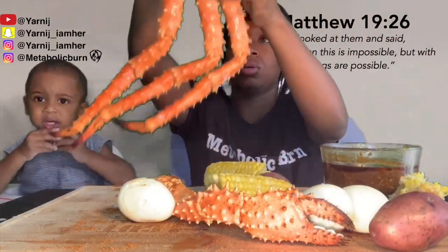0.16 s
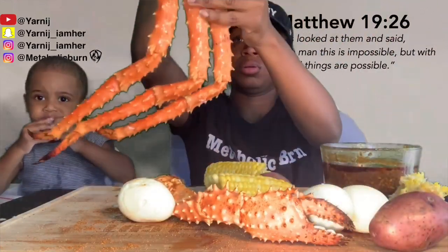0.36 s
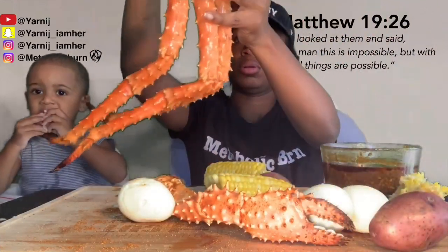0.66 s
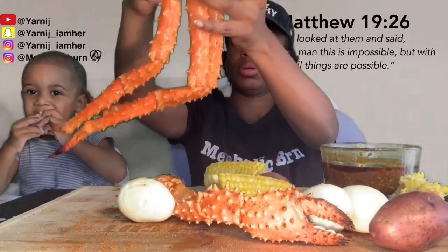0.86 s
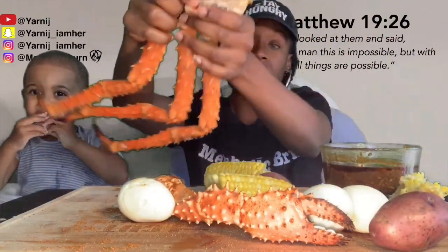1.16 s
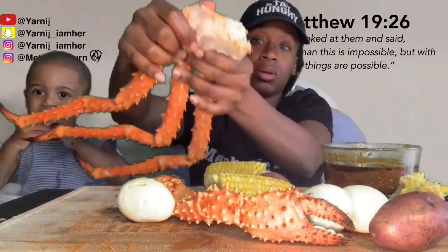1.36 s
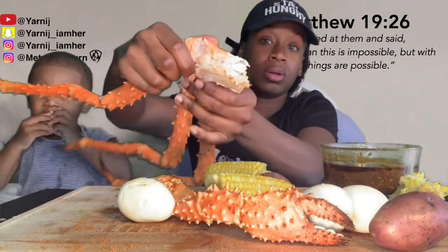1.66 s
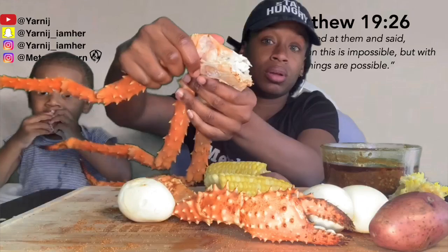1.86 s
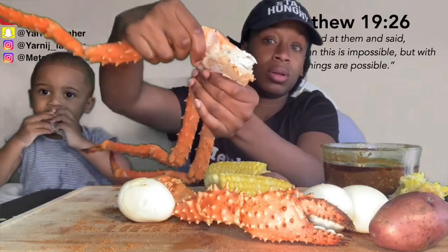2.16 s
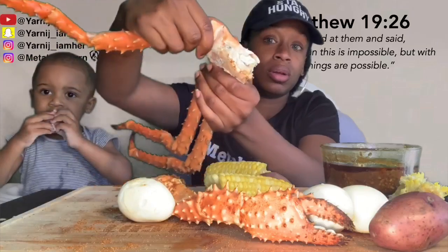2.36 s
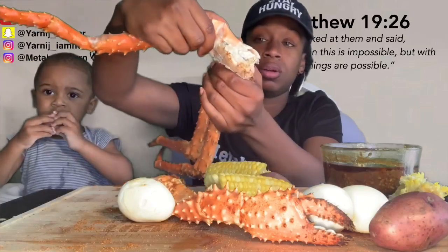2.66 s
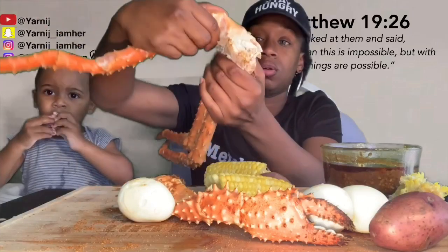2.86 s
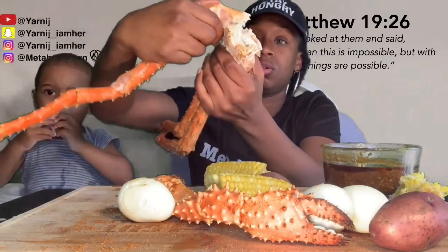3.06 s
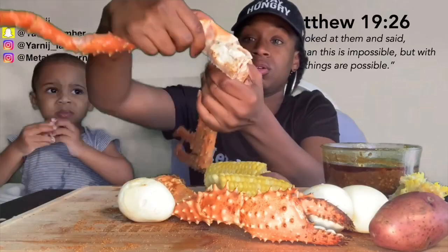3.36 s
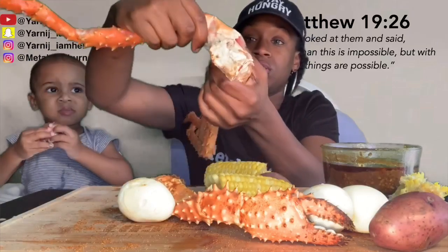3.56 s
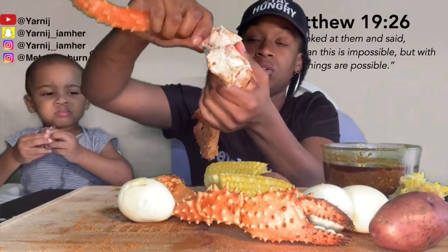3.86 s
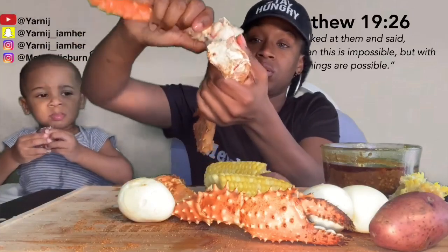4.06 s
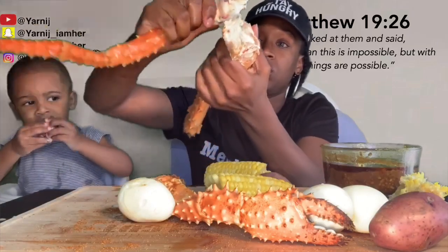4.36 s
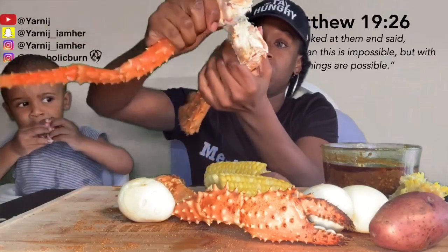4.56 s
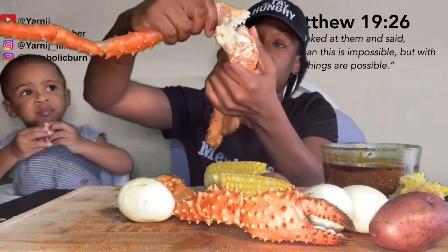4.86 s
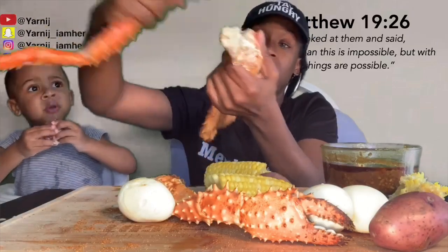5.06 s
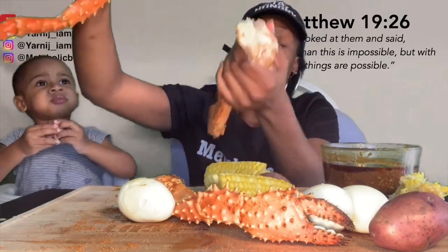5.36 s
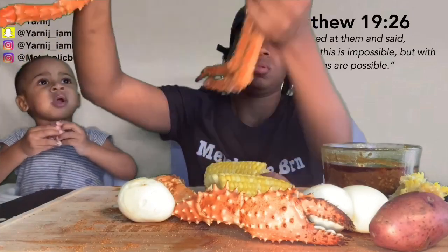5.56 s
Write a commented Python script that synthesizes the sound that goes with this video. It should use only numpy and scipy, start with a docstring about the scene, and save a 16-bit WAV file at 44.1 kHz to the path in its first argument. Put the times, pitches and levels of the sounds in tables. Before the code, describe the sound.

A close stereo phone pickup at a table in a small, hard room, with very low rumble and faint appliance tones throughout. From 0 to 1.4 s, cooked crab legs quietly rub, rustle and knock, the firmest hollow clacks around 0.9-1.1 s with a dull brush of sleeves. A nearly pure low hum holds from about 1.15 to 2.2 s; a soft double bump thuds at 1.6 s. Bright cracks start at 2.35 s, thickening with grainy tearing into the loudest crunching volley at 2.7-2.9 s, then a strong snap at 2.99 s. A tiny creak and ticks come at 3.3-3.4 s, a sharp crack at 3.55 s, lesser ones at 3.7 and 3.9 s, another strong snap at 4.05 s. Small ticks and faint rubbing follow until a hard crack at 5.0 s. Splinters and hollow shell ring briefly; the end is nearly quiet, with a faint knock and rustle near 5.4 s.

```python
"""Crab legs are snapped by hand at a table near a phone: each break is a snap and splinters ringing hollow shell.
Bending tears fibres (grainy noise) and sheds chips (tiny breaks); one twisted joint creaks (stick-slip pulses).
Before and between, legs rub, rustle (coloured grains) and knock (softer breaks); sleeves brush.
A dull modal bump and one low hum (sine and octave) precede the breaks; rumble and faint tones run throughout.
Table scatter and a small hard room (shaped noise responses) answer the hands."""
import sys
import numpy as np
from scipy import signal
from scipy.fft import rfft, irfft, next_fast_len
from scipy.io import wavfile
from scipy.ndimage import uniform_filter1d

SR = 44100
rng = np.random.default_rng(int(sys.argv[2]) if len(sys.argv) > 2 else 0)


def unload_wav(signal):
    """Save mono or channel-first audio to the path in sys.argv[1] as 16-bit WAV at rate SR, clipped to [-1, 1]."""
    wavfile.write(
        sys.argv[1],
        SR,
        np.round(np.clip(np.atleast_2d(signal).T, -1, 1) * 32767).astype(np.int16),
    )


N = 251655
TIME_S = np.arange(N) / SR

# Room rumble level: time_s, level_db
RUMBLE = [(0, -61), (1.3, -58), (2.9, -58), (4.4, -62), (5.7, -63.5)]
# Rumble spectrum: freq_hz, gain_db
RUMBLE_COLOUR = [(15, -32), (30, -3), (59, 2), (100, -8), (130, -3), (185, -11.5), (270, -11), (344, -23),
                 (450, -26.5), (1070, -28.5), (2100, -39.5), (4000, -43.5), (8000, -45), (16000, -48.5)]
# Faint appliance tones, pitch wandering: centre_hz, level_db
TONES = [(63.5, -71), (82.5, -70), (120, -71), (269, -79.5)]

# Legs sliding over each other: start_s, end_s, rub_db, rustle_db, plate_hz
HANDLING = [(.01, 0.19, -72.5, -73.5, 4740), (0.364, 0.63, -73.5, -86, 3700),
            (0.891, 1.05, -68, -70.5, 3200), (1.326, 1.43, -72, -73.5, 6550),
            (1.615, 1.673, -80, -77.5, 3350), (1.804, 2.3, -80, -97, 4810), (4.56, 4.83, -79.5, -85, 1920),
            (5.445, 5.48, -88.5, -83, 5390)]
# Dull rub spectrum: freq_hz, gain_db
RUB_COLOUR = [(200, 2.5), (400, -2.5), (700, -4.5), (1100, 0), (1480, 7), (1850, 2.5), (2120, -16),
              (4000, -25)]
# Spiny rustle spectrum: freq_hz, gain_db
RUSTLE_COLOUR = [(1200, -12.5), (2500, -4), (3600, 1), (5200, -3), (8000, -11.5), (16000, -16)]
RUB_ATTACK_S, RUB_RELEASE_S, RUSTLE_LIFT_DB = 0.03, 0.065, 9

# Joints bent until fibres tear: start_s, end_s, level_db
BENDS = [(2.442, 2.689, -64), (2.6, 2.91, -64), (3.33, 3.37, -67), (3.594, 3.676, -55.5),
         (3.937, 4.051, -67.5), (4.105, 4.198, -75.5), (4.367, 4.565, -82), (4.92, 5.002, -74)]
# Tearing spectrum: freq_hz, gain_db
TEAR_COLOUR = [(1000, -29), (3000, -6.5), (6500, -0.5), (9000, -2), (12000, -2.5), (16000, -7.5)]
BEND_ATTACK_S, BEND_RELEASE_S = 0.019, 0.023

# Unbroken legs meeting: start_s, level_db, brightness_db_per_octave, hollow_db, body_hz, body_lift_db
KNOCKS = [(0.02, -57, 8.5, -6, 3800, 16), (0.09, -71.5, -11, -1.5, 1350, 14),
          (0.1754, -65.5, -3.5, 13.5, 1380, 17), (0.385, -69, 2, 23.5, 3540, 11.5),
          (0.542, -71.5, -5.5, 9, 1240, 1), (0.574, -73.5, -4, 5, 3600, 14),
          (0.6589, -70.5, 3.5, 23, 1310, 6), (0.9105, -46, -0.5, 9, 3270, 11),
          (0.9767, -60.5, -7, 0.5, 3450, 4), (0.993, -56, -1, 7, 2650, 4),
          (1.0563, -53.5, 1.5, 15, 2310, 13.5), (1.0583, -55, -1, 18, 1160, 3.5),
          (1.074, -65, 4, 15, 1310, 5), (1.2223, -74, -11, 4.5, 2680, 17), (1.365, -68, -1.5, 13, 880, 11),
          (1.842, -72.5, -1, 10.5, 1240, 9), (4.66, -81, -4, 19.5, 1370, 10.5),
          (4.816, -67.5, 6, -3.5, 3800, 5.5), (4.853, -67.5, -4, 3.5, 1243, 6),
          (5.402, -71.5, -1, 16.5, 1843, 16)]
# Soft contact spectrum: freq_hz, gain_db
KNOCK_COLOUR = [(350, -3), (500, -6.5), (680, 5.5), (900, -2.5), (1200, 5), (1650, -6), (2300, -2.5),
                (3300, -4), (5000, -2.5), (8500, -17), (11500, -4.5), (16000, -10)]
KNOCK_SPLINTER_DB = -5.5  # chatter of the spines, relative to the snap
KNOCK_ARCH_DB = 3.5  # softer contact, narrower arch than a break
KNOCK_ROOM_DB, KNOCK_LEAD_S = -1.5, 0.00007  # gathered further left: left port leads

# Cloth spectrum: freq_hz, gain_db
SLEEVE_COLOUR = [(100, -19.5), (230, 3.5), (380, -3.5), (620, -19), (900, -12.5), (3000, -45)]
SLEEVE_START_S, SLEEVE_END_S, SLEEVE_DB = 0.88, 1.1, -66

HUM_HZ, HUM_DB = 123.5, -54.5  # centre of the wavering pitch and level
HUM_START_S, HUM_END_S, HUM_ATTACK_S, HUM_RELEASE_S = 1.146, 2.23, 0.019, 0.04

# Contacts as the legs are turned over: start_s, relative_level_db
BUMP_CONTACTS = [(1.603, -7.5), (1.616, 1)]
# Bump modes before detuning and sag: freq_hz, t60_s, level_db
BUMP_MODES = [(205.7, 0.44, -49), (252, 0.18, -49.5), (326.6, 0.37, -57), (434, 0.14, -65),
              (562, 0.21, -60)]
BUMP_SAG_SHARE, BUMP_SAG_S = 0.12, 0.063  # ring flattens as the grip loosens

# Shell breaks: start_s, level_db, brightness_db_per_octave, hollow_db, splinter_re_snap_db, body_hz, body_lift_db
BREAKS = [(2.3467, -46, 6.5, -10.5, -9, 5600, 9.5), (2.4364, -52, 9, 0, -3.5, 5240, 9.5),
          (2.4489, -56, 7, -3.5, -3.5, 3650, 5.5), (2.4702, -56, 7, -2.5, -2, 2990, 7),
          (2.4801, -59.5, 6, -6, -8, 5000, 2), (2.4862, -61.5, 12, -3, -8, 2990, 3),
          (2.508, -39.5, 7.5, 3, -2.5, 5940, 10), (2.521, -48.5, 8, 1, -4, 3630, 7.5),
          (2.5815, -54, 10.5, 4, -16, 4020, 1.5), (2.5854, -47, 10.5, 2.5, -13, 4000, 6.5),
          (2.592, -38, 2.5, 3, 0.5, 1270, 6.5), (2.6255, -53, 6.5, -0.5, -10, 8550, 6.5),
          (2.6351, -52, 8, 9, 2, 1370, 1.5), (2.6664, -47.5, 9, -3, -6, 3826, 1),
          (2.702, -51, 6, 0.5, -2, 4200, 7), (2.7148, -27, 5, -1.5, 1, 4700, 8),
          (2.7228, -37.5, -0.5, -5, 8, 2540, 10.5), (2.736, -34.5, 8, 5.5, -15, 2990, 5.5),
          (2.7534, -52.5, 3.5, -10.5, -11, 5000, 3.5), (2.7597, -34.5, 10.5, 14, -16, 4450, -2.5),
          (2.7726, -30, 9.5, 10.5, -4, 10800, 0.5), (2.781, -39, 4.5, 7.5, -10, 6000, 0.5),
          (2.7927, -42, -4, -2, 2, 880, 8), (2.8037, -38.5, 1, -1.5, -12, 8400, 5.5),
          (2.8177, -42, 5, -13.5, -6, 6000, 6), (2.8465, -31.5, 2.5, 2, 1, 890, 8.5),
          (2.8577, -37, 1.5, -1, -7.5, 2680, 1.5), (2.8649, -37, 4.5, -1, -14, 840, 5.5),
          (2.8706, -30, 5, 3, -8, 700, 7.5), (2.878, -36, 2.5, 2, -2, 2400, 4),
          (2.886, -35.5, 4, 3.5, -7, 5200, 12), (2.9856, -30.5, 3.5, 5.5, -4, 2740, 5),
          (2.9945, -45.5, 5, -2, -3, 2200, 6), (3.009, -49, 3.5, 8, -3.5, 1074, 9),
          (3.3112, -49, 7.5, -1, 5.5, 3050, 15.5), (3.3212, -59.5, 9, -6, -8, 3300, 11),
          (3.3295, -58.5, 13.5, -11.5, 4, 3480, 15), (3.402, -65.5, -7, -4.5, -7, 1200, 11),
          (3.4216, -48, -1.5, -0.5, -7.5, 1240, 6), (3.434, -64, -4, -0.5, -8, 1220, 10),
          (3.5513, -31, 7, 7, -7.5, 3240, 5.5), (3.558, -37, 7.5, 1.5, -8.5, 2000, 9),
          (3.5613, -36, 4, -4.5, -5, 2110, 2.5), (3.7193, -46, 5, 9.5, -9.5, 2860, 3.5),
          (3.8764, -50.5, 1, 3, -9, 1190, 6), (3.89, -58, 4, -4, -1.5, 8000, -4),
          (3.9028, -71, 2, -4, -13.5, 8100, 11), (3.961, -53, 5, 3, -1, 2000, 6.5),
          (3.968, -57, 4, 5.5, -2, 3300, 5.5), (3.988, -49.5, 9.5, -7.5, -13, 7200, 8),
          (3.994, -56.5, 6, -8, 0.5, 4230, 15), (4.0205, -64, -5.5, 1, -3, 3400, 9),
          (4.0267, -56.5, -3.5, -1, -3, 4000, 6.5), (4.0512, -32, 1.5, 9.5, -8, 9700, 8),
          (4.0575, -37.5, -4, -2, -10.5, 1870, 12.5), (4.076, -39.5, 3, 14.5, -14, 1060, 10),
          (4.1815, -53, -2.5, -4, -11.5, 1340, 9), (4.195, -64, -7, 1.5, -10.5, 2100, 15.5),
          (4.2295, -70.5, -7, 0.5, -8.5, 2190, 11.5), (4.37, -52.5, 1.5, 1, -4, 2654, 0),
          (4.388, -63, 5, -5.5, -6.5, 8000, 6), (4.4035, -60.5, 6, -5, -18.5, 4000, -6),
          (4.8732, -46, 4.5, -3.5, -10, 3070, 8.5), (4.8833, -61, 12.5, -3.5, -6.5, 3200, -0.5),
          (4.985, -51, 3, 5, 11.5, 2310, 4.5), (4.9982, -29.5, 2.5, 0, -8, 1310, 7.5),
          (5.004, -41.5, 2.5, 0, -3, 3640, 9), (5.025, -47.5, 7.5, 5, 4, 6050, 3)]
# Bands that colour a fracture: low_hz, high_hz
FRACTURE_BANDS = [(450, 1600), (1600, 4000), (4000, 10000), (10000, 16500)]
BAND_FILTERS = [signal.butter(3, edges_hz, "bandpass", fs=SR, output="sos") for edges_hz in FRACTURE_BANDS]
# Hollow leg modes before detuning: freq_hz, t60_s, relative_level_db
SHELL_MODES = [(765, 0.014, -8), (893, 0.047, -2.5), (2000, 0.043, 2.5), (3300, 0.03, -0.5)]
# Spectrum of all breaks: freq_hz, gain_db
BREAK_COLOUR = [(350, -0.5), (500, -10), (750, 0.5), (1100, 0.5), (1350, 3), (1650, -10), (2100, -3),
                (3300, 2), (5000, 1), (6600, -3.5), (8500, 6), (10200, 3), (11800, -2.5), (13300, -0.5),
                (16000, -13)]
PIVOT_HZ = 4000
BREAK_ARCH_DB = 2.27  # fall one octave from the pivot, growing with the square
BODY_Q = 5.6  # wet shell is well damped

CHIPS_PER_S, CHIP_SPREAD_DB, CHIP_BRIGHTNESS_DB_PER_OCTAVE = 30, 6.5, 5
CHIP_DB, CHIP_SPLINTER_DB = 0, -0.5  # relative to the tearing; relative to the snap
CHIP_BODY_HZ, CHIP_LIFT_DB = 3800, 4  # each chip rings within an octave of this

CREAK_START_S, CREAK_END_S, CREAK_DB = 3.313, 3.374, -56.5
CREAK_SLIPS_PER_S, CREAK_HZ, CREAK_Q = 740, 3550, 1.6  # typical slip rate; plate resonance

# Direct sound, hands a little to the right: freq_hz, left_minus_right_db
HAND_BALANCE = [(600, -3), (1400, 1), (2200, 1), (3400, -3.5), (5500, -0.5), (8000, 0)]
# Reverberation spectrum: freq_hz, gain_db
ROOM_COLOUR = [(300, -0.5), (800, -4.5), (1400, -4.5), (2300, -3), (4500, -8), (6500, -5.5), (8500, -13.5),
               (12000, -8), (16000, -11.5)]
# Reverberation decay: freq_hz, t60_s
ROOM_T60 = [(400, 0.2), (1000, 0.62), (2800, 0.5), (6500, 0.51), (9500, 0.3), (14000, 0.28)]
# Diffuse sound at the two ports: freq_hz, left_right_correlation
LIKENESS = [(60, 0.57), (200, 0.54), (600, 0.025), (4500, 0.01), (6500, 0.18), (8000, 0.98), (16000, 1)]
SCRAPE_ROOM_DB, BREAK_ROOM_DB = -2, 0

# Phone channel phase: freq_hz, left_lead_rad
PORT_PHASE = [(30, 0), (1000, -.6), (2000, -1.15), (3000, -1.85), (4000, -2.15), (5200, -3.5), (6500, -4.3),
              (9000, -3.15), (10500, -2.4), (12000, -1.2), (13500, -.05), (16000, .3)]
# Phone channel level: freq_hz, left_minus_right_db
PORT_BALANCE = [(300, 0), (700, 0), (1300, -2.6), (2800, -1), (5000, -1), (8000, 0)]
TOP_HZ = 16300


def undb(db):
    """Convert decibels to gain."""
    return 10 ** (np.asarray(db) / 20)


def unit(x):
    """Scale to rms 1."""
    return x / np.sqrt(np.mean(x ** 2) + 1e-30)


def at(points, hz):
    """Interpolate (freq_hz, value) points over log frequency."""
    f, value = np.transpose(points)
    return np.interp(np.log(np.maximum(hz, 1)), np.log(f), value)


def bins_hz(x):
    """Frequencies of the spectrum of x."""
    return np.fft.rfftfreq(x.shape[-1], 1 / SR)


def colour(x, points):
    """Filter with a (freq_hz, gain_db) spectrum."""
    size = next_fast_len(x.shape[-1], True)
    gain = undb(at(points, np.fft.rfftfreq(size, 1 / SR)))
    return irfft(rfft(x, size) * gain, size)[..., :x.shape[-1]]


def walk(rate_hz):
    """Smoothed random steps: slow wandering of rms 1."""
    k = int(SR / rate_hz)
    steps = np.repeat(rng.standard_normal(N // k + 1), k)
    return unit(uniform_filter1d(uniform_filter1d(steps, k), k)[:N])


def swell(start_s, end_s, attack_s, release_s):
    """Exponential growth up to the start, hold at 1, exponential decay after the end."""
    rise = np.maximum(start_s - TIME_S, 0) / attack_s
    fall = np.maximum(TIME_S - end_s, 0) / release_s
    return np.exp(-rise - fall)


def diffuse(size):
    """White stereo noise with the left-right correlation of sound from all round."""
    noise = rng.standard_normal((2, size))
    mid, side = rfft(noise)
    alike = np.clip(at(LIKENESS, bins_hz(noise)), -1, 1)
    mid = mid * np.sqrt((1 + alike) / 2)
    side = side * np.sqrt((1 - alike) / 2)
    return irfft(np.array([mid + side, mid - side]), size)


def grains(points, spread_db, size=32):
    """Friction as coloured noise whose strength jumps every fraction of a millisecond."""
    jumps = np.repeat(np.clip(rng.standard_normal(N // size + 1), -3, 3), size)[:N]
    strength_db = spread_db * jumps + 3.3 * walk(17)
    return unit(colour(rng.standard_normal(N) * undb(strength_db), points))


def ring(modes, t, stretch):
    """Sum of decaying modes, each detuned by its own stretch."""
    out = 0
    for (hz, t60_s, db), k in zip(modes, stretch):
        decay = np.exp(-np.log(1000) * t / t60_s)
        out = out + undb(db) * np.sin(2 * np.pi * hz * k * t) * decay
    return out


def resonate(x, hz, q):
    """One damped resonance, gain 1 at its centre."""
    return signal.lfilter(*signal.iirpeak(min(hz, SR / 4), max(q, 1), fs=SR), x)


def body(sound, hz, lift_db):
    """A piece of shell gathers the energy around its own resonance; total level is kept."""
    rung = sound + (undb(lift_db) - 1) * resonate(sound, hz, BODY_Q)
    return rung * np.std(sound) / np.std(rung)


def background(flicker_db=1.4):
    """Room rumble of diffuse coloured noise, plus faint appliance tones as wandering sines."""
    tones = 0
    for hz, db in TONES:
        phase = 2 * np.pi * np.cumsum(hz + 2 * walk(6)) / SR
        tones = tones + undb(db) * unit(np.sin(phase))
    rumble_db = np.interp(TIME_S, *np.transpose(RUMBLE)) + flicker_db * walk(3.0)
    return undb(rumble_db) * unit(colour(diffuse(N), RUMBLE_COLOUR)) + tones


def scraping(rub_grain_db=4, rustle_grain_db=6, tear_grain_db=13):
    """Friction grains: legs rub, catching spines ring a plate, bent fibres tear."""
    rub, rustle = grains(RUB_COLOUR, rub_grain_db), grains(RUSTLE_COLOUR, rustle_grain_db)
    effort = sum(undb(db) * swell(start_s, end_s, BEND_ATTACK_S, BEND_RELEASE_S) for start_s, end_s, db in BENDS)
    out = effort * grains(TEAR_COLOUR, tear_grain_db)
    for start_s, end_s, rub_db, rustle_db, plate_hz in HANDLING:
        slide = undb(rub_db) * rub + undb(rustle_db) * body(rustle, plate_hz, RUSTLE_LIFT_DB)
        out = out + swell(start_s, end_s, RUB_ATTACK_S, RUB_RELEASE_S) * slide
    return out


def band_levels(db, brightness_db, hollow_db, arch_db):
    """Arched spectrum over the octaves, tipped by brightness; an open leg lifts the lowest band."""
    octaves = np.log2(np.sqrt(np.prod(FRACTURE_BANDS, axis=1)) / PIVOT_HZ)
    return db + brightness_db * octaves - arch_db * octaves ** 2 + hollow_db * (octaves == octaves.min())


def fracture(levels_db, splinter_db, travel_s=0.000499, ragged_db=-9, snap_s=0.0002,
             splinter_s=0.0034, splinter_spread_db=9, detune=0.1):
    """A snap and thinning splinters drive the hollow shell modes; bands set the colour."""
    t = np.arange(SR // 16) / SR
    noise, splinter_noise, sizes = rng.standard_normal((3, len(t)))
    ragged = unit(noise * t * np.exp(-t / snap_s))
    snap = unit(1. * (t == 0)) + undb(ragged_db) * ragged
    envelope = (1 - np.exp(-t / 0.013)) * np.exp(-t / splinter_s)
    splinters = unit(splinter_noise * undb(splinter_spread_db * sizes) * envelope)
    force = snap + undb(splinter_db) * splinters
    # dispersive bending waves: treble leaves first; travel_s is the delay at 4 kHz
    dispersion = np.exp(-2j * np.pi * travel_s * 2 * np.sqrt(4000 * bins_hz(t)))
    force = irfft(rfft(force) * dispersion, len(t))
    # pieces differ slightly in size and shape
    stretch = np.exp(detune * np.clip(rng.standard_normal(len(SHELL_MODES)), -2, 2))
    shell = ring(SHELL_MODES, t, stretch)
    sound = force + undb(-40) * signal.fftconvolve(force, shell)[:len(t)]
    sound = sound * np.minimum(1, 2 - 2 * t / t[-1])
    out = 0
    for sos, db in zip(BAND_FILTERS, levels_db):
        band = signal.sosfilt(sos, sound)
        out = out + undb(db) * band / np.sqrt(np.mean(band[:SR // 100] ** 2))  # rms of first 10 ms
    return out


def fractures(rows, arch_db):
    """Place fractures, each ringing the body of its piece."""
    out = np.zeros(N + SR)
    for start_s, db, brightness_db, hollow_db, splinter_db, body_hz, lift_db in rows:
        levels_db = band_levels(db, brightness_db, hollow_db, arch_db)
        sound = body(fracture(levels_db, splinter_db), body_hz, lift_db)
        start = int(start_s * SR)
        out[start:start + len(sound)] += sound
    return out[:N]


def knocks():
    """Legs meet without breaking: fractures with a narrower arch and a softened spectrum."""
    rows = [(*row[:4], KNOCK_SPLINTER_DB, *row[4:]) for row in KNOCKS]
    return colour(fractures(rows, KNOCK_ARCH_DB), KNOCK_COLOUR)


def sleeves(attack_s=0.31, release_s=0.16, grain_db=3):
    """Arms shift as the legs are lifted: a dull brush of cloth from friction grains."""
    envelope = swell(SLEEVE_START_S, SLEEVE_END_S, attack_s, release_s)
    return undb(SLEEVE_DB) * envelope * grains(SLEEVE_COLOUR, grain_db)


def hum(waver_hz=1.8, waver_db=1.0, octave_db=-22):
    """A nearly pure low tone with a weak octave holds for about a second, wavering."""
    phase = 2 * np.pi * np.cumsum(HUM_HZ + waver_hz * walk(4.6)) / SR
    envelope = swell(HUM_START_S, HUM_END_S, HUM_ATTACK_S, HUM_RELEASE_S)
    level = undb(HUM_DB + waver_db * walk(8.53)) * envelope
    return level * unit(np.sin(phase) + undb(octave_db) * np.sin(2 * phase))


def bump(rise_s=0.002, detune=0.031, rough=0.56):
    """Two soft contacts ring low modes that sag in pitch and shudder in the hands."""
    out = 0
    for start_s, db in BUMP_CONTACTS:
        t = np.maximum(TIME_S - start_s, 0)
        settling = BUMP_SAG_S * (1 - np.exp(-t / BUMP_SAG_S))
        sagging = t * (1 - BUMP_SAG_SHARE) + BUMP_SAG_SHARE * settling
        stretch = np.exp(detune * rng.standard_normal(len(BUMP_MODES)))
        out = out + undb(db) * ring(BUMP_MODES, sagging, stretch) * (1 - np.exp(-t / rise_s))
    return out * unit(1 + rough * walk(220))


def breaks(rows):
    """Shell snaps: fractures with the spectrum of breaking shell."""
    return colour(fractures(rows, BREAK_ARCH_DB), BREAK_COLOUR)


def chips(count=40):
    """Rows of tiny fractures at random moments of each bend, louder the harder it tears."""
    rows = []
    for start_s, end_s, db in BENDS:
        places, sizes = rng.random(count), rng.standard_normal(count)
        pieces = rng.uniform(-1, 1, count)
        used = round((end_s - start_s) * CHIPS_PER_S)
        for place, size, piece in zip(places[:used], sizes, pieces):
            chip_s = start_s + place * (end_s - start_s)
            level_db = db + CHIP_DB + CHIP_SPREAD_DB * np.clip(size, -1, 1)
            rows.append((chip_s, level_db, CHIP_BRIGHTNESS_DB_PER_OCTAVE, 0, CHIP_SPLINTER_DB,
                         CHIP_BODY_HZ * 2 ** piece, CHIP_LIFT_DB))
    return rows


def creak(jitter=0.35, spread_db=3, attack_s=0.001, release_s=0.026, count=64):
    """A twisted joint: uneven stick-slip pulses ring a plate of shell and die away."""
    gaps, sizes = rng.standard_normal((count, 2)).T
    times_s = CREAK_START_S + np.cumsum(np.exp(jitter * gaps)) / CREAK_SLIPS_PER_S
    slips = np.bincount((times_s * SR).astype(int), undb(spread_db * sizes), N)[:N]
    plate = resonate(resonate(slips, CREAK_HZ, CREAK_Q), CREAK_HZ, CREAK_Q)
    plate = plate / np.std(plate[(TIME_S > times_s[0]) & (TIME_S < times_s[-1])])
    return undb(CREAK_DB) * plate * swell(CREAK_START_S, CREAK_END_S, attack_s, release_s)


def table(x, scatter_db=-7, first_s=0.00078, fade_s=0.005):
    """Table top, dishes and arms scatter the sound within milliseconds."""
    t = np.arange(SR // 25) / SR
    envelope = unit(np.clip(t / first_s - 1, 0, 1) * np.exp(-t / fade_s))
    response = diffuse(len(t)) * envelope / np.sqrt(len(t))
    return undb(scatter_db) * signal.fftconvolve(x[None], response, axes=1)[:, :N]


def room(x, first_s=0.00059, build_s=0.0088, echo_spread_db=3):
    """Uneven wall echoes thicken into a tail with its own decay time in each band."""
    t = np.arange(SR * 3 // 4) / SR
    echoes = np.repeat(rng.standard_normal(len(t) // 32 + 1), 32)[:len(t)]
    noise = diffuse(len(t)) * undb(echo_spread_db * echoes * np.exp(-t / 0.039))
    onset = 1 - np.exp(-np.maximum(t - first_s, 0) / build_s)
    spectrum = rfft(noise) * undb(at(ROOM_COLOUR, bins_hz(t)))
    centres_hz, response = np.transpose(ROOM_T60)[0], 0
    # overlapping triangular bands
    for (_, t60_s), share in zip(ROOM_T60, np.eye(len(ROOM_T60))):
        band = irfft(spectrum * at(np.c_[centres_hz, share], bins_hz(t)), len(t))
        decay = unit(onset * np.exp(-np.log(1000) * t / t60_s))
        response = response + band * decay / np.sqrt(len(t))
    return signal.fftconvolve(x[None], response, axes=1)[:, :N]


def heard(x, room_db, lead_s):
    """Sound from one place arrives directly, off the table and through the room."""
    hz, sign = bins_hz(x), np.array([[1], [-1]]) / 2
    balance = undb(sign * at(HAND_BALANCE, hz))
    lead = np.exp(2j * np.pi * hz * sign * lead_s)
    direct = irfft(rfft(x) * balance * lead, N)
    return direct + table(x) + undb(room_db) * room(x)


def scene(places=4):
    """Mix; moving hands deal the breaks in turn to places with their own echoes."""
    rows = BREAKS + chips()
    shell = sum(heard(breaks(rows[k::places]), BREAK_ROOM_DB, 0) for k in range(places))
    gathering = heard(knocks(), KNOCK_ROOM_DB, KNOCK_LEAD_S)
    friction = heard(scraping() + creak(), SCRAPE_ROOM_DB, 0)
    return shell + gathering + friction + sleeves() + bump() + hum() + background()


def record(dry):
    """The phone's two channels differ in phase and level; the top is cut."""
    hz, sign = bins_hz(dry), np.array([[1], [-1]]) / 2
    phase = np.exp(1j * sign * at(PORT_PHASE, hz))
    balance = undb(sign * at(PORT_BALANCE, hz))
    ports = irfft(rfft(dry) * phase * balance, N)
    return signal.sosfilt(signal.ellip(8, .2, 70, TOP_HZ, fs=SR, output="sos"), ports)


dry = scene()
out = record(dry)
unload_wav(out)
```